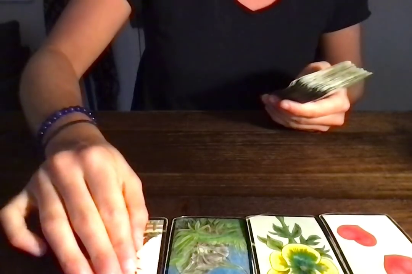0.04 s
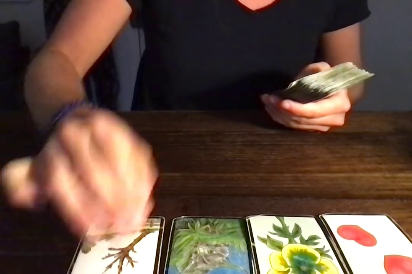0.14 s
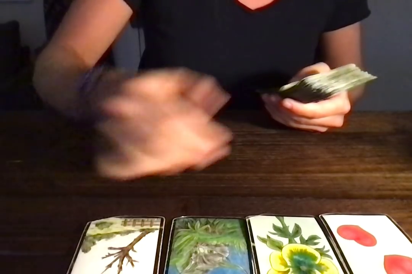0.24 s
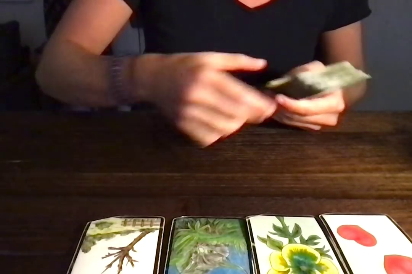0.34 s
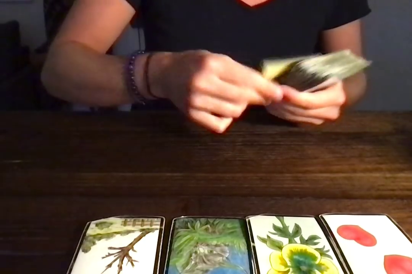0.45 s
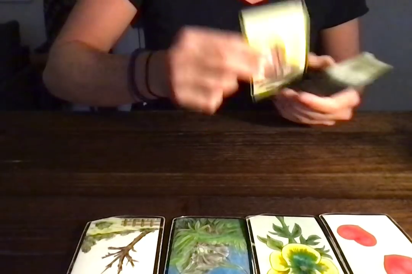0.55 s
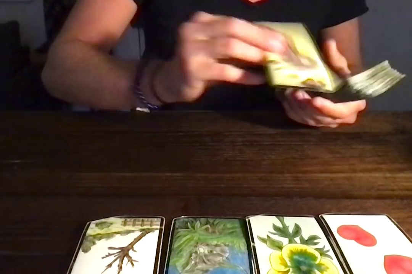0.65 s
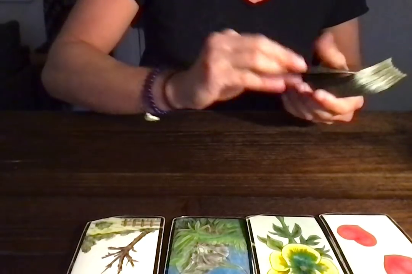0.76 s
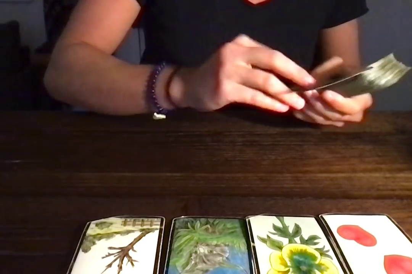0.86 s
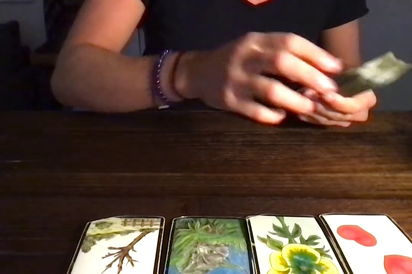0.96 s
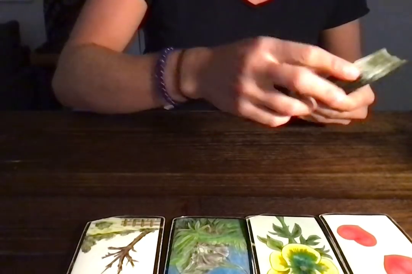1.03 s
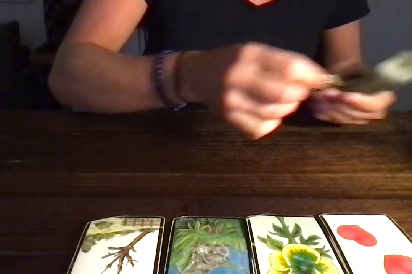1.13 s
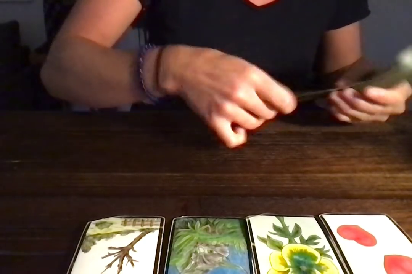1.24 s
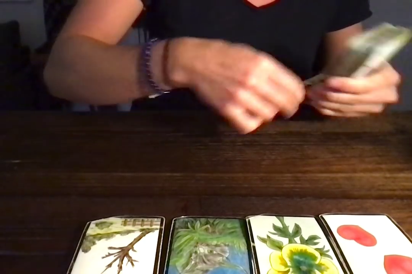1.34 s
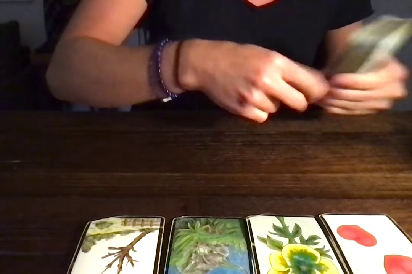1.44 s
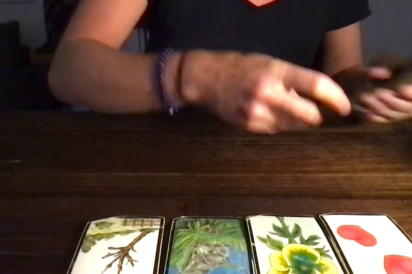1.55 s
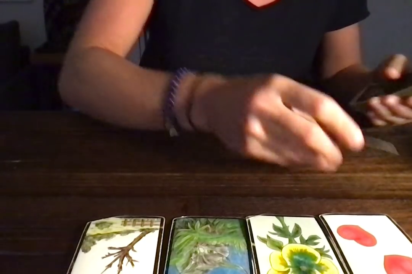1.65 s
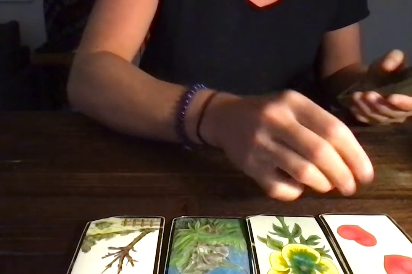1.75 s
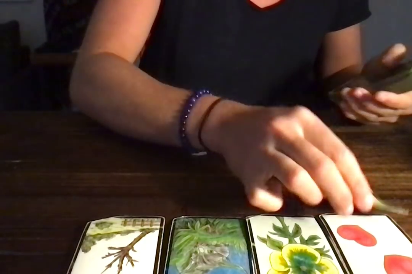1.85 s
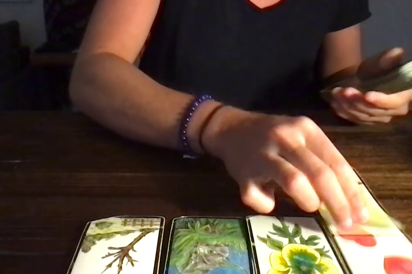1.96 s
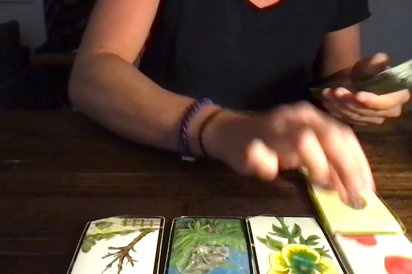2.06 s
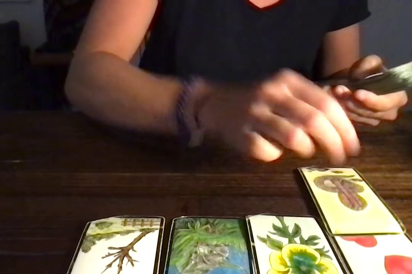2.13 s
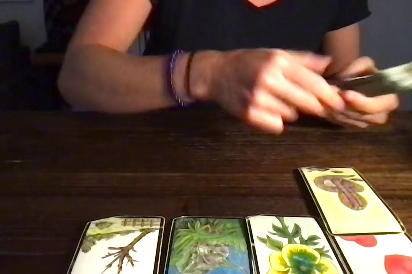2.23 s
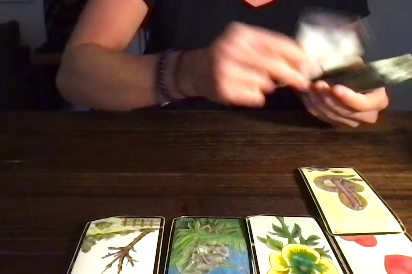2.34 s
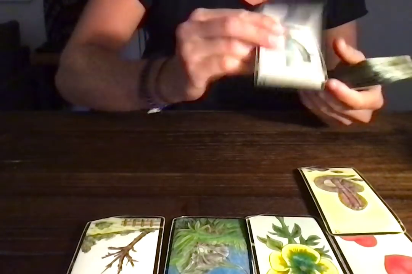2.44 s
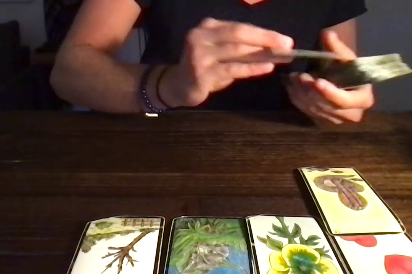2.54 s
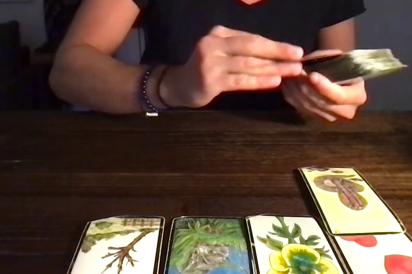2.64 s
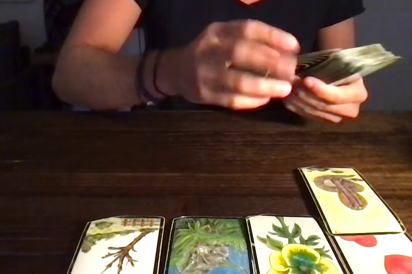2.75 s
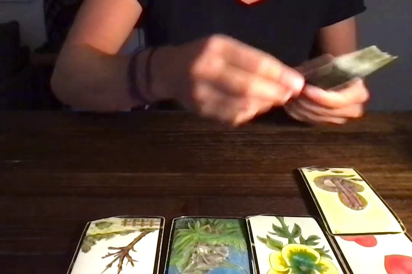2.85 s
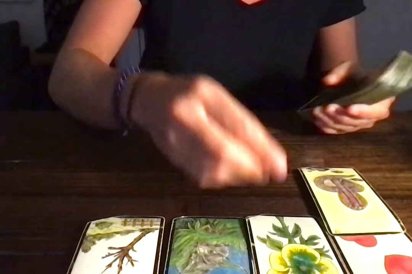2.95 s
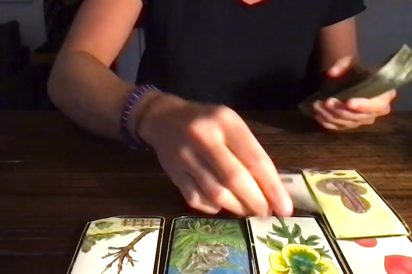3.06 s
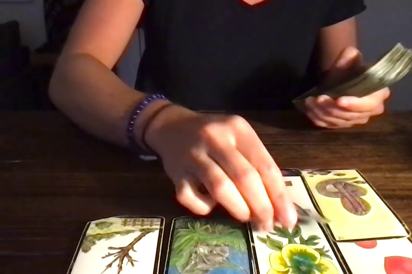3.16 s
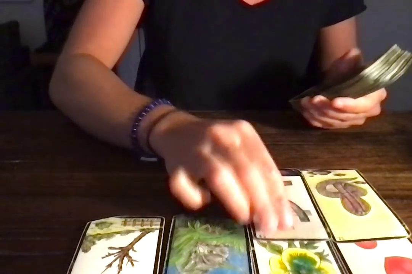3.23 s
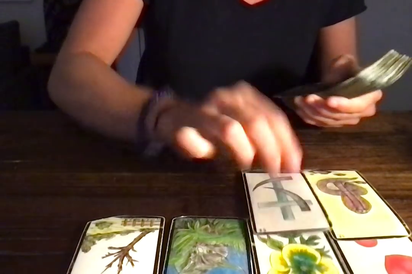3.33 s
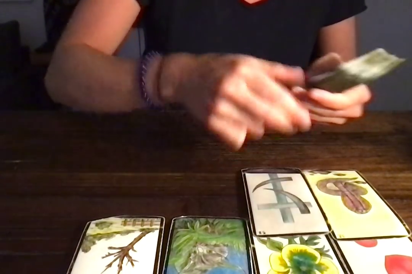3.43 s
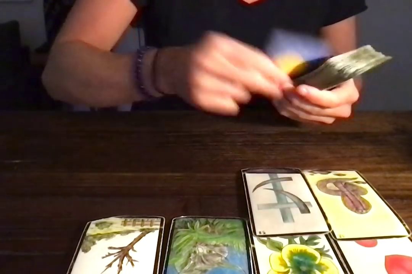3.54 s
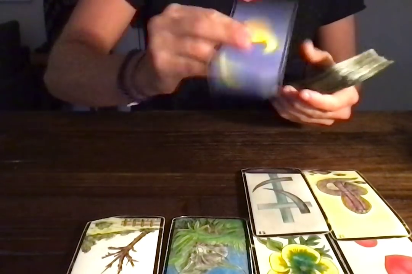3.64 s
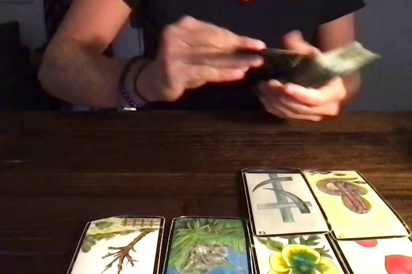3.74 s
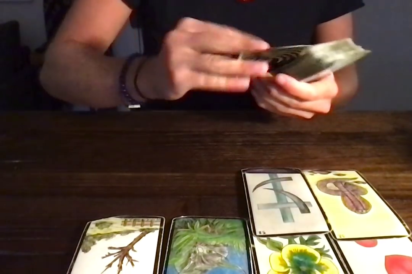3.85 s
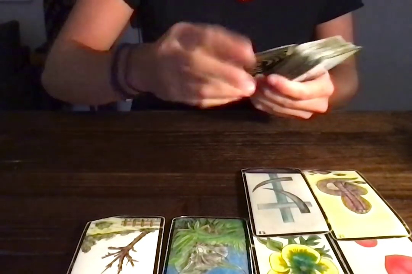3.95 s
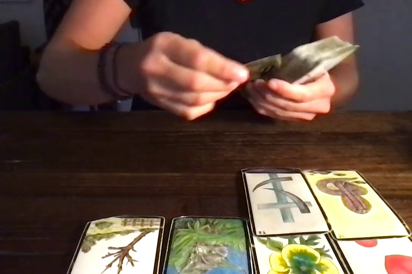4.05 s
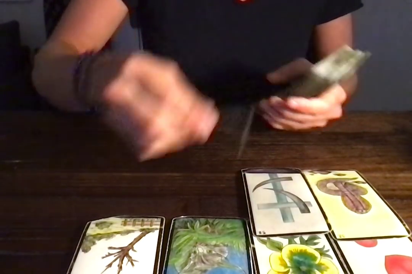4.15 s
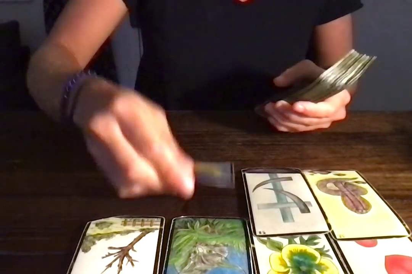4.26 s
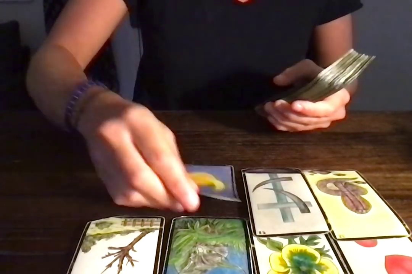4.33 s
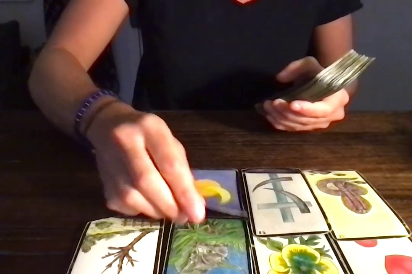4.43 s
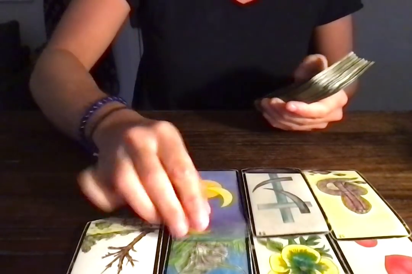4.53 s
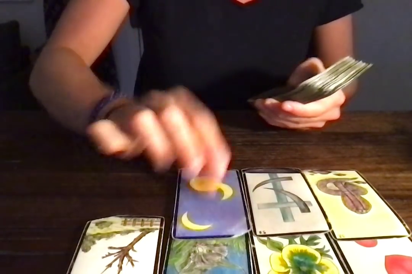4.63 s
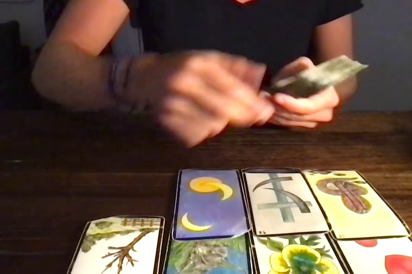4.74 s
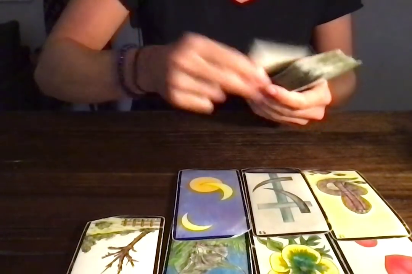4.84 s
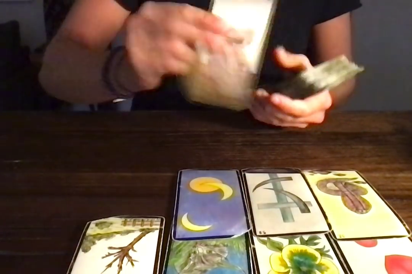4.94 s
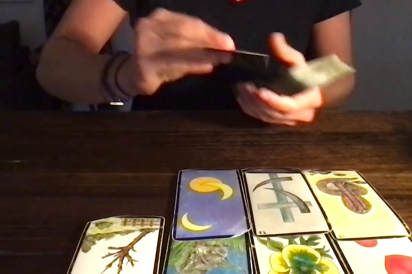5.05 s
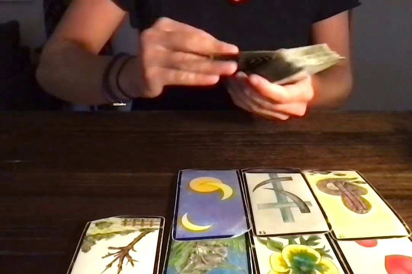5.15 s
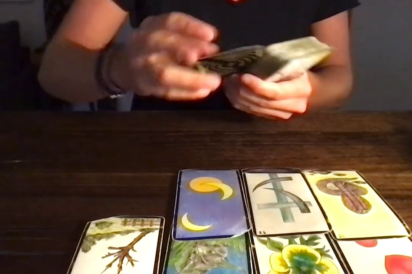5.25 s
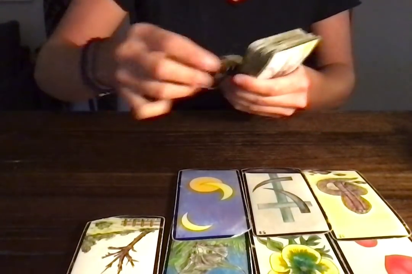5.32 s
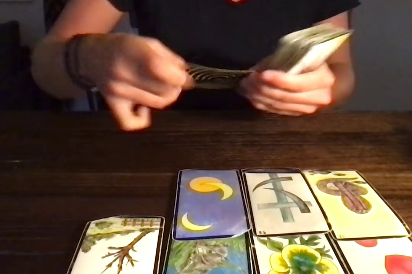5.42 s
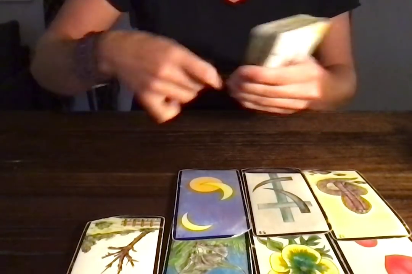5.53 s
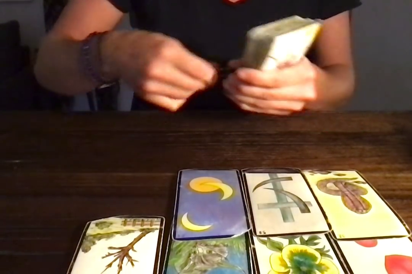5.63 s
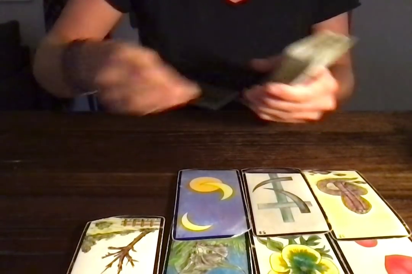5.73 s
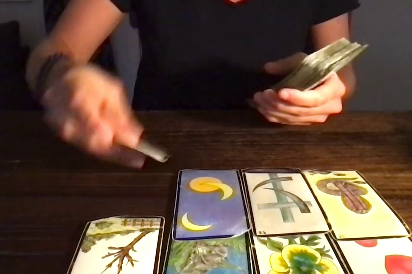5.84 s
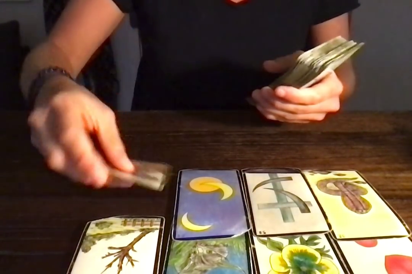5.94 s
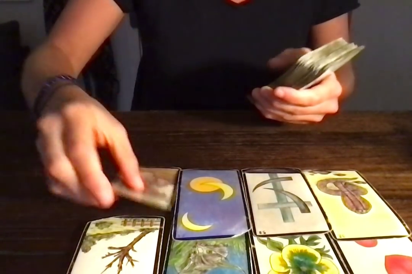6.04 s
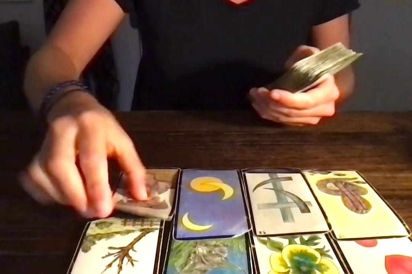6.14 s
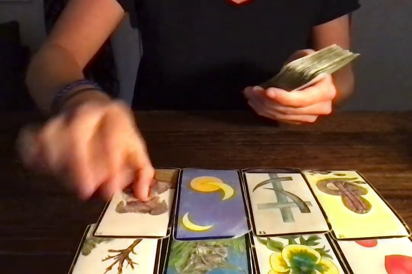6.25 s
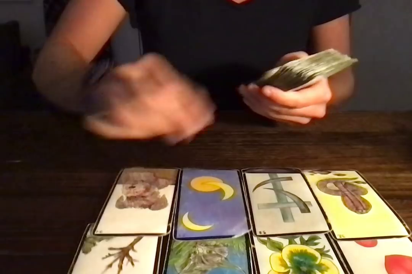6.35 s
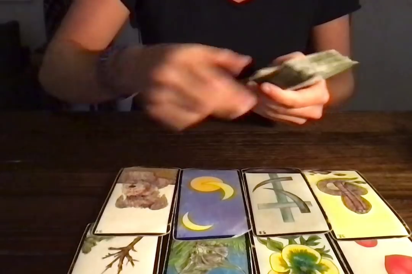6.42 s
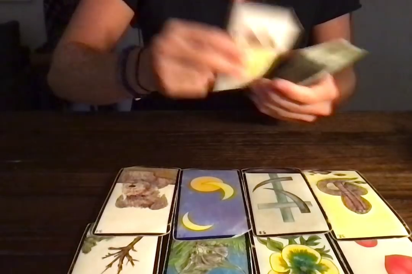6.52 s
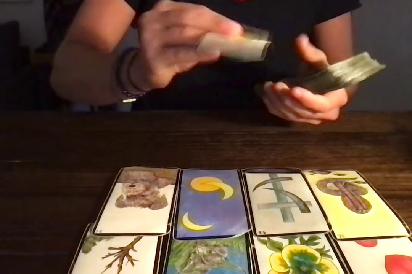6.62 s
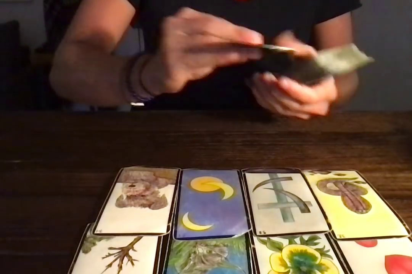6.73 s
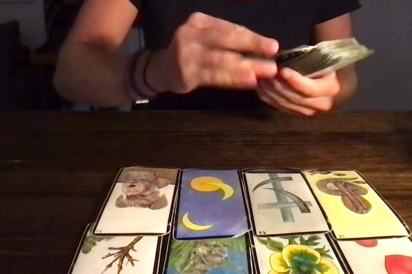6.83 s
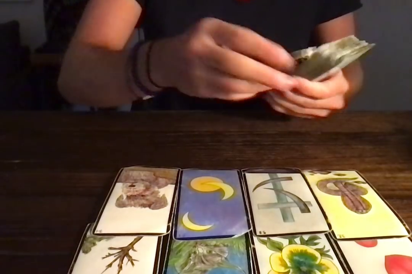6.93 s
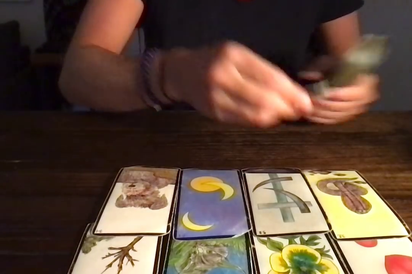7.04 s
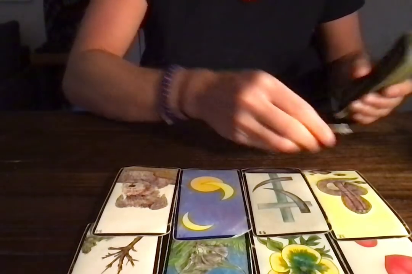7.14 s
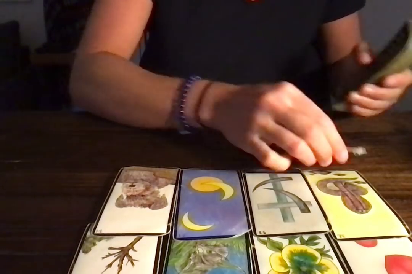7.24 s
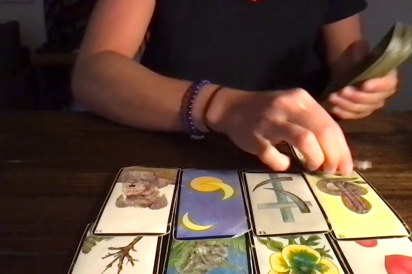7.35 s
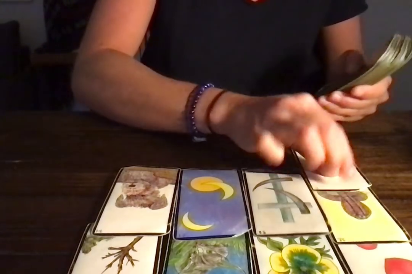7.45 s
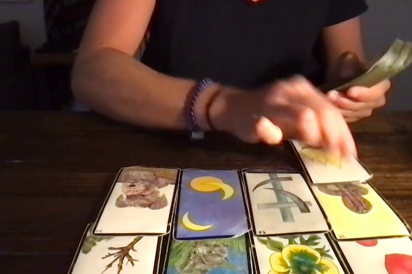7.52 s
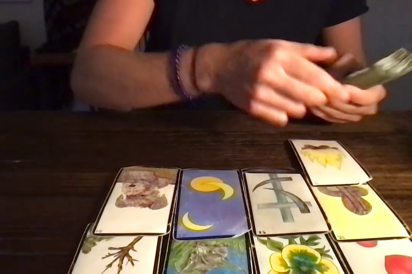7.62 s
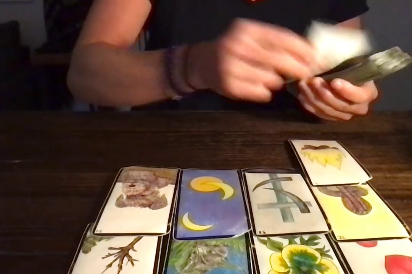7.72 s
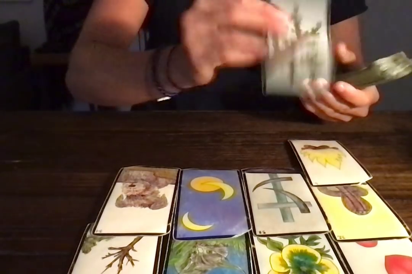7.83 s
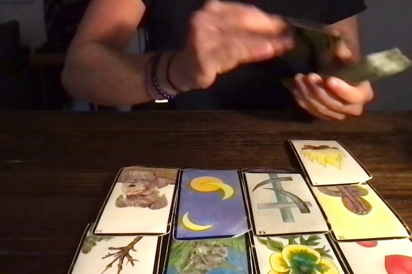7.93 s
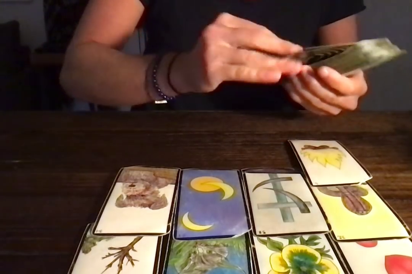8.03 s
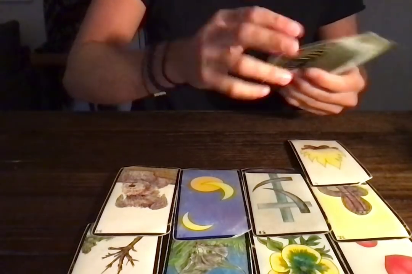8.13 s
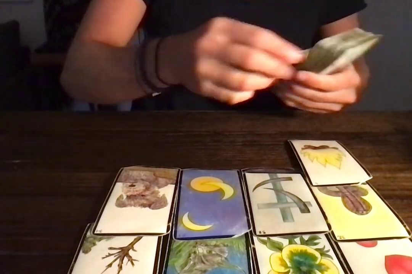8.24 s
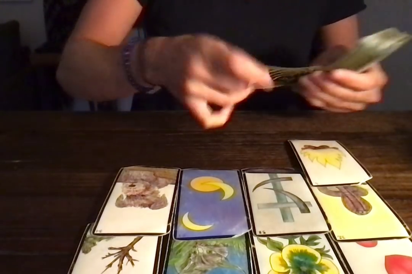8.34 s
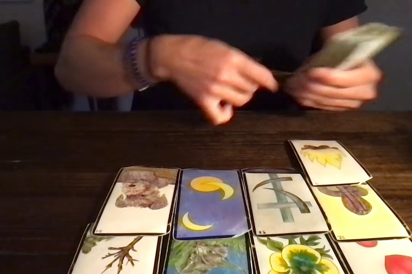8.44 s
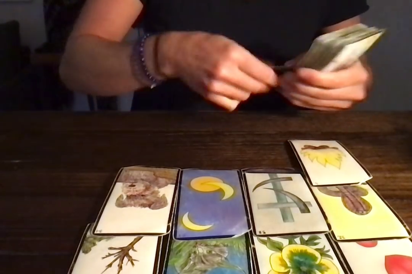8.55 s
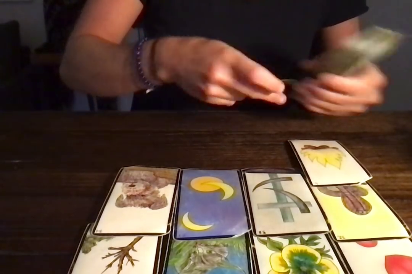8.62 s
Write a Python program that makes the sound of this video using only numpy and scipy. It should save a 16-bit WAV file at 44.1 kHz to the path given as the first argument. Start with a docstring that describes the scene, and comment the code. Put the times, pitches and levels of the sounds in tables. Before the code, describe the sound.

Cards are laid down steadily: papery slide and bump off the deck, light fumbling and skin rustle, then a crisp snap on the wooden tabletop with a tiny flop and a scraping push. This repeats five times, and one extra edge clatter against the table comes before the second snap. Low hum and still air lie beneath. Small hard room with soft early reflections, one modest mono microphone, slightly dull at the very top.

```python
"""Stiff playing cards snap one by one onto a wooden table: a grainy click sounds card, edge and wood modes.
Between snaps, filtered grain noise and light blows make cards rasp off a hand-held deck and touch fingers, pack
and, around 2.94 s, the table. Filtered noise makes the arms' rumble, the hands' rustle and still air; sines a hum.
Place: a small, bare room, with soft early reflections and a diffuse tail whose bands fade at their own rates.
Microphone: one small mono microphone, short of deep bass, into a recorder that cuts the top."""
import sys
import numpy as np
from scipy import signal
from scipy.fft import rfft, irfft, next_fast_len
from scipy.io import wavfile
from scipy.ndimage import uniform_filter1d

SR = 44100
rng = np.random.default_rng(int(sys.argv[2]) if len(sys.argv) > 2 else 0)


def put_to_file(sound):
    """Save the sound as 16-bit audio at rate SR, in the file named by the first command-line argument."""
    columns = np.atleast_2d(sound).T  # one column per channel
    safe = np.clip(columns, -1, 1)
    whole_steps = np.round(safe * 32767)
    wavfile.write(sys.argv[1], SR, whole_steps.astype(np.int16))


N = 382788
TIME = np.arange(N) / SR


def undb(db):
    """Turn decibels into an amplitude factor."""
    return 10 ** (np.asarray(db) / 20)


def unit(x):
    """Scale to rms 1."""
    return x / np.sqrt(np.mean(x ** 2))


def blow(x, db):
    """Scale a short sound so that its energy equals that of 10 ms at the given rms level."""
    return x * undb(db) / np.sqrt(np.sum(x ** 2) * 100 / SR)


def add(out, s, x):
    """Mix x into out from time s."""
    i = max(int(s * SR), 0)
    out[i:i + len(x)] += x[:max(len(out) - i, 0)]


def ring(x, response):
    """Play x through an impulse response."""
    return signal.oaconvolve(x, response)[:len(x)]


def colour(x, points, size=1024):
    """Causal minimum-phase filter that follows a table of hz and gain_db."""
    hz, db = np.transpose(points)
    f = np.maximum(np.arange(size // 2 + 1) * SR / size, 1)
    gain = undb(np.interp(np.log(f), np.log(hz), db))
    # folding the cepstrum forward in time puts the energy first
    cepstrum = irfft(np.log(gain))
    cepstrum[1:size // 2] *= 2
    cepstrum[size // 2 + 1:] = 0
    return ring(x, irfft(np.exp(rfft(cepstrum))))


def walk(rate):
    """Slow random drift with a spread near 1, drawn afresh rate times per second."""
    k = int(SR / rate)
    steps = np.repeat(rng.standard_normal(N // k + 1), k)
    return unit(uniform_filter1d(steps, k))[:N]


def grains(n, spread_db):
    """Paper fibres catching: dense clicks of very uneven size."""
    size_db = spread_db * np.minimum(rng.exponential(size=n), 6)
    return unit(rng.standard_normal(n) * undb(size_db))


def bands(x, centres):
    """Split x into overlapping bands that add up to x again."""
    spectrum = rfft(x)
    f = np.maximum(np.arange(len(x) // 2 + 1) * SR / len(x), 1)
    shares = [np.interp(np.log(f), np.log(centres), pick) for pick in np.eye(len(centres))]
    return [irfft(spectrum * share, len(x)) for share in shares]


def flutter(x, depth_db, rate):
    """The contact patch wanders, so that neighbouring bands swell and fade apart."""
    padded = np.pad(x, (0, next_fast_len(N, True) - N))
    parts = bands(padded, np.geomspace(400, 12000, 11))
    return unit(sum(part[:N] * undb(depth_db * walk(rate)) for part in parts))


# spectrum of the still room's noise, scaled as a whole later: hz, relative level_db
AIR_SPECTRUM = [(100, -7), (190, -4.5), (300, -6.5), (430, -11), (560, -17), (1000, -24.5), (1650, -28),
                (2250, -18), (2700, -18.5), (3200, -23.5), (7000, -23.5), (12000, -32), (16000, -42)]
AIR_DB = -77.5  # rms
# hum and a faint whine: pitch_hz, level_db (rms, before its wavering)
HUM_TONES = [(79.3, -66.5), (48.6, -75.5), (180, -77), (2180, -90)]


def background():
    """A hum of sines, slightly wavering in level and phase, over steady filtered noise."""
    hum = np.zeros(N)
    for hz, db in HUM_TONES:
        level = undb(db + 1.9 * walk(5.1))
        phase = 2 * np.pi * hz * TIME + 0.62 * walk(8.3)
        hum += level * np.sqrt(2) * np.sin(phase)
    air = unit(colour(rng.standard_normal(N), AIR_SPECTRUM))
    return hum + air * undb(AIR_DB)


# early reflections off nearby surfaces: delay_ms, level_db against the direct sound
REFLECTIONS = [(3.4, -41.5), (8.3, -18), (13.4, -33.5), (21.3, -22)]


def room(x):
    """Direct sound and a few early reflections, softened in the treble, each late by its longer path."""
    response = np.zeros(SR // 20)
    for ms, db in REFLECTIONS:
        add(response, ms / 1000, undb(db) * np.array([.25, .5, .25]))
    return x + ring(x, response)


# diffuse tail of the small room, band by band: hz, level_db, t60_s
ROOM_TAIL = [(60, -20, .6), (193, -9.5, 0.71), (500, -5.5, 0.54), (1250, -6, 0.57), (2920, -13, 0.62),
             (6000, -14.5, 0.49), (10000, -12, 0.36), (16000, -20.5, .28)]


def tail(x, size=SR):
    """Diffuse room sound: noise bands that build up quickly and decay, the highest ones soonest."""
    t, response = np.arange(size) / SR, np.zeros(size)
    centres = [row[0] for row in ROOM_TAIL]
    noises = bands(rng.standard_normal(size), centres)
    for (_, db, t60), noise in zip(ROOM_TAIL, noises):
        fade = np.exp(-np.log(1000) * t / t60) * (1 - np.exp(-t / 0.0014))
        response += noise * undb(db) * fade / np.sqrt(np.sum(fade ** 2))
    return ring(x, response)


# the top card slides off the pack, knocks free of it and is turned over in the fingers:
# knock_s, slide_length_s, slide_db, card_db, knock_db, thump_db, knock_hz, turn_length_s, turn_db
# (turn_db is taken before the gain of the rustle)
CARD_DRAWS = [(0.5557, .15, -61.5, -35.5, -35, -29.5, 564, 1, -67.5),
              (2.396, .11, -51, -44, -39.5, -29.5, 420, 0.71, -62.5),
              (3.5993, 0.095, -52.5, -32, -30, -30.5, 440, .2, -61.5),
              (4.9125, 0.097, -53.5, -37, -34, -36.5, 337, 0.22, -58.5),
              (6.569, 0.084, -48.5, -42, -39.5, -29.5, 393, 0.62, -61.5),
              (7.802, 0.12, -54.5, -42.5, -46.5, -39, 403, 0.71, -70)]
TURN_ATTACK_S, TURN_RELEASE_S, TURN_SAG_DB_PER_S = 0.047, 0.054, 4.5
REST_DB = -82.5  # hands that only reach out, before the gain of the rustle


def turning():
    """Fingers' effort: starts as a card comes free, sags while it is turned, stops as the hand reaches out."""
    effort = np.full(N, undb(REST_DB))
    for s, *_, length, db in CARD_DRAWS:
        age = TIME - s
        attack = np.clip(1 + age / TURN_ATTACK_S, 0, 1)
        release = np.exp(-np.maximum(age - length, 0) / TURN_RELEASE_S)
        effort += attack * release * undb(db - TURN_SAG_DB_PER_S * np.maximum(age, 0))
    return effort


# spectrum of forearms on the table top: hz, relative level_db
RUMBLE_SPECTRUM = [(20, -16), (35, -10), (51, 1.5), (65, 4.5), (80, 1), (110, -4), (160, -22.5), (260, -27),
                   (600, -57.5)]
# course of that rumble, before its gain: time_s, level_db
RUMBLE_COURSE = [(0.0, -57), (0.24, -68), (0.39, -60.5), (0.58, -57), (1.06, -51.5), (1.5, -59.5),
                 (1.72, -65), (1.86, -60.5), (2.1, -55.5), (4.57, -57), (4.91, -54.5), (6.26, -59),
                 (7.03, -55), (8.68, -55.5)]
# spectrum of skin and cloth: hz, relative level_db
RUSTLE_SPECTRUM = [(90, -19), (160, 9), (260, 2), (390, -2.5), (520, -2), (660, -1), (900, -10.5),
                   (1400, -9.5), (3000, -39)]
RUMBLE_GAIN_DB, RUSTLE_GAIN_DB = 2.5, 6


def arms(effort):
    """Forearms rumble on the table while skin and cloth rustle in fits with the fingers' work."""
    rumble = unit(colour(rng.standard_normal(N), RUMBLE_SPECTRUM, size=8192))
    rumble_db = np.interp(TIME, *np.transpose(RUMBLE_COURSE)) + RUMBLE_GAIN_DB
    rustle = flutter(colour(grains(N, 5.8), RUSTLE_SPECTRUM, size=2048), depth_db=4, rate=18)
    fits = undb(RUSTLE_GAIN_DB + 2 * walk(22))
    return rumble * undb(rumble_db) + rustle * effort * fits


# a card brushes along the skin: start_s, end_s, level_db
SKIN_RUBS = [(0.81, 0.904, -57), (1.062, 1.346, -58.5), (1.405, 1.522, -58), (1.597, 1.791, -58.5),
             (1.843, 1.885, -68), (2.847, 2.89, -53), (3.84, 3.89, -64), (4.043, 4.099, -58.5),
             (4.28, 4.53, -69.5), (5.037, 5.196, -65.5), (5.34, 5.441, -63.5), (5.697, 5.78, -61),
             (6.03, 6.194, -65), (6.72, 6.895, -62.5), (7.003, 7.058, -53.5), (7.28, 7.336, -57.5),
             (8.226, 8.308, -59), (8.417, 8.492, -63.5), (8.52, 8.68, -62.5)]
# rasp of the card's sheet: hz, relative level_db
RASP_SPECTRUM = [(300, -12.5), (700, 0.5), (1200, -6), (1700, -0.5), (2250, 7), (3000, -2.5), (4200, -8.5),
                 (7000, -15), (14000, -29)]
# hiss of the card's edge: hz, relative level_db
HISS_SPECTRUM = [(2000, -32.5), (4000, 7.5), (6500, 5), (9000, -6), (11500, -2.5), (14000, -3),
                 (16500, -15)]
SLIDE_HISS_DB, RUB_HISS_DB = -8, -10  # hiss against rasp: card on card, card on skin
SLIDE_SKEW, RUB_SKEW = 0.9, 0.71  # above 1 a stroke is fastest late, below 1 early
SCRAPE_LEAD_S, SCRAPE_S = 0.021, 0.019  # the scrape starts this long before a snap, and its length
JERK_DB, STICK_DB = 3, 3  # unevenness of the pull, of sticking fibres
CATCH_SHARE, CATCHES_PER_S = 0.79, 90  # single catches of a fibre


def rubs():
    """Sliding card: an uneven pull drives the rasp of the sheet and the hiss of its edge; fibres crackle."""
    rasp, hiss = np.zeros((2, N))
    # off the pack, along the skin, and off the fingertip just before a snap
    strokes = [(s - length, length + 0.003, db, SLIDE_HISS_DB, SLIDE_SKEW)
               for s, length, db, *_ in CARD_DRAWS]
    strokes += [(start - .008, end - start + .02, db, RUB_HISS_DB, RUB_SKEW)
                for start, end, db in SKIN_RUBS]
    strokes += [(s - SCRAPE_LEAD_S, SCRAPE_S, db, RUB_HISS_DB, RUB_SKEW)
                for s, *_, db in CARD_SNAPS]
    for start, length, db, hiss_db, skew in strokes:
        # the pull gathers speed, then lets go
        progress = np.linspace(0, 1, int(length * SR)) ** skew
        stroke = undb(db) * abs(np.sin(np.pi * progress)) ** 0.51
        add(rasp, start, stroke)
        add(hiss, start, stroke * undb(hiss_db))
    speed = undb(JERK_DB * walk(35) + STICK_DB * walk(170) - 1.8)
    catches = unit((rng.random(N) < CATCHES_PER_S / SR) * rng.standard_normal(N))
    friction = grains(N, 3.5) + CATCH_SHARE * catches
    sheet = flutter(colour(friction, RASP_SPECTRUM), depth_db=4.5, rate=32)
    edge = flutter(colour(grains(N, 3), HISS_SPECTRUM), depth_db=3, rate=16)
    return speed * rasp * sheet + np.sqrt(speed) * hiss * edge


def modes(t, table, detune, scatter_db):
    """Decaying modes; grip and point of contact change their pitch and weights from blow to blow."""
    hz, db, t60 = np.transpose(table)[:, :, None]
    pitch, weight = rng.standard_normal((2, len(table), 1))
    fade = undb(db + scatter_db * weight) * np.exp(-np.log(1000) * t / t60)
    return np.sum(fade * np.cos(2 * np.pi * hz * (1 + detune * pitch) * t), axis=0)


# resonances of the wooden top: pitch_hz, level_db, t60_s
WOOD_MODES = [(147, 0.5, 0.097), (186.4, 6.5, 0.12), (258.2, 2, 0.097), (330, 1, 0.061), (377, 1, 0.069),
              (473, 1.5, 0.064), (610, -12, 0.048), (626, -3, 0.076), (736, -12, 0.013), (796, -8, 0.11),
              (995, 2.5, 0.057)]
# crack of the card's face: hz, gain_db
CRACK_SPECTRUM = [(300, -40.5), (1200, -10), (1900, 4), (2700, 4), (3800, -0.5), (5200, -7), (7000, -15.5),
                  (10000, -34), (16000, -51)]
# tick of the card's edge: hz, gain_db
EDGE_SPECTRUM = [(1500, -20), (3500, 7.5), (5200, 2.5), (6900, 1.5), (9000, -4.5), (11000, -9), (14500, -7),
                 (16500, -52.5)]
# smack that goes with the wood: hz, gain_db
SMACK_SPECTRUM = [(80, -8), (150, 11), (260, 6.5), (400, 2.5), (650, 1), (850, -12.5), (1020, -1.5),
                  (1250, -27.5), (2000, -14.5), (5000, -39.5)]
# soft fingertips and wood pass little treble: hz, gain_db
CUSHION_SPECTRUM = [(1000, -2), (2000, 0), (4000, -5), (8000, -44), (16000, -66.5)]


def contact(card_db, edge_db, knock_db, thump_db, contact_ms, flex_hz, knock_hz,
            crunch, flex_db, smack_db, hollow_db, thump_hz, thump_s):
    """One blow: a click and brief crunch of fibres sound card, edge and wood; the hand's weight thumps."""
    t = np.arange(SR // 12) / SR
    fade = np.exp(-1000 * t / max(contact_ms, .2))
    drive = crunch * np.sqrt(contact_ms) * blow(grains(len(t), 4.75) * fade, 0)
    drive -= blow(1. * (t == 0), 0)
    # the card never lands flat: a few weaker touches follow within milliseconds
    drive[rng.integers(SR // 700, SR // 90, 3)] += .2 * rng.standard_normal(3)
    # the free length of card sets its flexing pitch
    crack = colour(drive, CRACK_SPECTRUM)
    flex_modes = [(flex_hz, 0, .011), (1.537 * flex_hz, -6, .008)]
    flex = ring(crack, modes(t, flex_modes, detune=0.069, scatter_db=-2.5))
    card = blow(crack, 0) + blow(flex, flex_db)
    edge = colour(drive, EDGE_SPECTRUM)
    # the place of the blow favours the modes near one pitch, and a short hollow ring is added there
    body = [(hz, db - 7 * abs(np.log2(hz / knock_hz)), t60) for hz, db, t60 in WOOD_MODES]
    body.append((knock_hz, hollow_db, .045))
    soft = colour(drive, CUSHION_SPECTRUM)
    knock = ring(soft, modes(t, body, detune=.015, scatter_db=2))
    wood = blow(knock, 0) + blow(colour(soft, SMACK_SPECTRUM), smack_db)
    thump = -np.sin(2 * np.pi * thump_hz * t) * np.exp(-t / thump_s) * (1 - t / t[-1])
    return blow(card, card_db) + blow(edge, edge_db) + blow(wood, knock_db) + blow(thump, thump_db)


# how each kind of touch sounds: contact time, edge against card,
# smack and hollow ring against wood, thump pitch and decay
FREEING = dict(contact_ms=4.25, edge_db=-15.5, smack_db=3.5, hollow_db=-1, thump_hz=69, thump_s=0.0065)
BRIGHT = dict(contact_ms=2.58, edge_db=-7.5, smack_db=-7.5, hollow_db=4.5, thump_hz=60, thump_s=.013)
DULL = dict(contact_ms=3.1, edge_db=-22.5, smack_db=-4.5, hollow_db=7.5, thump_hz=60, thump_s=0.018)
DULL_FLEX_HZ = 2100  # flexing pitch of the card in freeing and dull touches


def tap(card_db, knock_db, thump_db, flex_hz, knock_hz, contact_ms, edge_db, **body):
    """A touch of the cards, crunchier than a snap, its edge level tied to that of the card."""
    return contact(card_db, card_db + edge_db, knock_db, thump_db, contact_ms, flex_hz, knock_hz,
                   crunch=0.97, flex_db=-3, **body)


FUMBLES_PER_S = 6
FUMBLE_DB = 5.5  # against the fingers' effort


def fumbles(effort, count=120):
    """Faint touches at chance times and knock pitches, as strong as the fingers are busy."""
    out = np.zeros(N)
    times = np.cumsum(rng.exponential(size=count)) / FUMBLES_PER_S
    for s in times[times < N / SR]:
        db = 20 * np.log10(effort[int(s * SR)]) + FUMBLE_DB
        knock_hz = rng.uniform(300, 700)
        add(out, s, tap(db + 4, db, db, DULL_FLEX_HZ, knock_hz, **DULL))
    return out


# dull touches of the cards: fingertips on card and pack, and around 2.94 s a card edge hitting the table:
# time_s, card_db, knock_db, thump_db, knock_hz
DULL_TOUCHES = [(0.143, -69.5, -70, -66, 430), (0.4622, -47.5, -52.5, -49, 403),
                (0.5772, -45.5, -45, -58, 500), (0.7358, -53.5, -46, -44, 630),
                (0.9613, -44, -59, -55, 640), (1.033, -51, -48, -46, 237),
                (1.3852, -49.5, -41.5, -41.5, 557), (1.525, -56.5, -50, -41.5, 480),
                (1.602, -50, -47.5, -44, 396), (2.714, -44.5, -54, -47, 750), (2.774, -48, -44.5, -40, 405),
                (2.909, -53, -47.5, -46, 537), (2.945, -30.5, -29.5, -34, 388),
                (3.4733, -51, -58, -55, 700), (3.7339, -52.5, -43.5, -42, 390),
                (3.79, -48.5, -50, -41, 527), (3.956, -56.5, -49.5, -56, 395),
                (3.996, -60, -57.5, -54, 300), (4.093, -61, -68, -66.5, 490),
                (4.151, -60.5, -54.5, -42, 650), (4.193, -59, -43.5, -51, 420),
                (5.089, -53.5, -45.5, -51, 555), (5.109, -59, -58.5, -45.5, 397),
                (5.28, -51.5, -50, -46, 260), (5.2969, -46, -38, -45, 246), (5.522, -57.5, -51.5, -63, 623),
                (5.602, -54.5, -53, -49.5, 554), (5.751, -55, -55, -45.5, 274),
                (5.837, -63.5, -49.5, -64, 402), (6.009, -68.5, -59.5, -70, 857),
                (6.457, -55, -50.5, -57, 570), (6.7472, -63, -47, -51, 380),
                (6.7718, -48.5, -44.5, -58, 500), (6.7982, -51.5, -39, -54, 252),
                (6.881, -46, -44.5, -41.5, 570), (6.978, -51, -47, -65, 650),
                (7.987, -48.5, -45.5, -47, 620), (8.174, -48.5, -44.5, -66, 586),
                (8.2282, -51, -49, -55, 570), (8.513, -49.5, -48.5, -45, 660), (8.57, -53.5, -45, -60, 650)]


def bumps():
    """Dull blows as a card comes free or is touched, each led in by a short brush of the card."""
    out, t = np.zeros(N), np.arange(SR // 25) / SR
    blows = [(s, *knock, FREEING) for s, _, _, *knock, _, _ in CARD_DRAWS]
    blows += [(*row, DULL) for row in DULL_TOUCHES]
    for s, card_db, knock_db, thump_db, knock_hz, touch in blows:
        add(out, s, tap(card_db, knock_db, thump_db, DULL_FLEX_HZ, knock_hz, **touch))
        fade = np.exp(-1000 * t / (1.5 * touch["contact_ms"]))
        brush = colour(grains(len(t), 5), RASP_SPECTRUM) * fade
        # reversed, so that it swells into the blow
        add(out, s - len(t) / SR, blow(brush[::-1], card_db - 14.5))
    return out


# bright touches of the cards: corners flicking, and around 2.94 s a card edge hitting the table:
# time_s, card_db, knock_db, flex_hz, knock_hz
BRIGHT_TOUCHES = [(0.397, -47, -48, 2580, 250), (0.8163, -43, -46, 2400, 645),
                  (1.067, -45.5, -46.5, 2100, 640), (1.194, -47, -48.5, 1950, 640),
                  (2.263, -49.5, -49.5, 3400, 350), (2.4539, -35.5, -43, 2210, 388),
                  (2.6233, -43.5, -41.5, 1980, 547), (2.9421, -33, -32.5, 1670, 403),
                  (2.9649, -32, -34, 2690, 330), (3.651, -38.5, -42, 2000, 380),
                  (4.8265, -42.5, -45, 2630, 604), (4.9661, -35.5, -45, 2420, 603),
                  (6.039, -50.5, -52, 2170, 565), (6.6208, -36.5, -39, 2300, 373),
                  (7.116, -26, -30, 2760, 513), (7.6929, -48.5, -46.5, 3460, 370),
                  (7.8596, -45, -47.5, 2370, 372), (8.025, -47.5, -42.5, 3620, 343)]
BRIGHT_THUMP_DB = -6  # against the knock
REBOUND_S, REBOUND_DB = 0.0081, -12  # the card springs back and touches again


def flicks():
    """The stiff card touches with a short bright click and rebounds once."""
    out = np.zeros(N)
    for s, card_db, knock_db, flex_hz, knock_hz in BRIGHT_TOUCHES:
        thump_db = knock_db + BRIGHT_THUMP_DB
        for delay, db in (0, 0), (REBOUND_S, REBOUND_DB):
            click = tap(card_db, knock_db, thump_db, flex_hz, knock_hz, **BRIGHT)
            add(out, s + delay, undb(db) * click)
    return out


# push of the laid card along the table: hz, relative level_db
PUSH_SPECTRUM = [(400, -6.5), (1300, -24), (2000, -17.5), (2500, 28.5), (3200, 26.5), (4100, -42),
                 (5200, -1), (9000, -57), (15000, -37.5)]
# a bent card scrapes off the fingertip, snaps onto the table, then is pushed into place:
# time_s, card_db, edge_db, knock_db, thump_db, contact_ms, flex_hz, knock_hz,
# push_db (before its swell and fade), lead_db, lead_ms, scrape_db
CARD_SNAPS = [(1.9925, -24.5, -26.5, -27, -28.5, 2.3, 2720, 273, -62, -35, 6.3, -63),
              (3.242, -28.5, -31.5, -26, -28.5, 2.93, 2230, 295, -48.5, -30, 2.6, -47),
              (4.561, -25, -26, -29.5, -33, 2.97, 3630, 576, -46.5, -42.5, 8.6, -35),
              (6.181, -30.5, -27, -29.5, -40, 9.9, 2050, 480, -55.5, -47, 6.9, -48),
              (7.4238, -28, -29, -30, -27, 3.3, 2800, 490, -40.5, -24, 1.4, -77)]
FLOP_DB = -12  # the rest of the card against its corner


def snaps():
    """The corner slaps the table after a swelling scrape, the rest of the card flops after it and is pushed on."""
    out, t = np.zeros(N), np.arange(SR // 3) / SR
    for s, *touch, push_db, lead_db, lead_ms, _ in CARD_SNAPS:
        contact_ms = touch[4]
        # a slower contact leaves the far end longer in the air
        flop_s = 0.0073 + 0.00066 * contact_ms
        for delay, db in (0, 0), (flop_s, FLOP_DB):
            slap = contact(*touch, crunch=.6, flex_db=-2.5, smack_db=0.5, hollow_db=-7.5,
                           thump_hz=139, thump_s=0.0049)
            add(out, s + delay, undb(db) * slap)
        lead = colour(grains(len(t), 3), CRACK_SPECTRUM) * np.exp(-1000 * t / lead_ms)
        # reversed, so that it swells into the snap
        add(out, s - len(t) / SR, blow(lead[::-1], lead_db))
        swell = (1 - np.exp(-t / 0.016)) * np.exp(-t / 0.15) * (1 - (t / t[-1]) ** 2)
        push = unit(colour(grains(len(t), 1.6), PUSH_SPECTRUM)) * swell
        add(out, s, push * undb(push_db))
    return out


def scene(count=3):
    """A card radiates differently in each direction, so several versions of each snap feed the room."""
    effort = turning()
    bed = arms(effort) + background()
    directions = [snaps() for _ in range(count)]
    handling = rubs() + flicks() + bumps() + fumbles(effort)
    diffuse = sum(tail(handling + snap) for snap in directions) / np.sqrt(count)
    # the first version is also the direct sound; the bed gets no room sound
    return (room(handling + directions[0]) + diffuse + bed)[None]


TOP_HZ = 16400  # upper limit of the recorder


def record(dry):
    """The small microphone loses the deepest bass; the recorder cuts the top."""
    bass_cut = signal.butter(4, 37, "high", fs=SR, output="sos")
    top_cut = signal.ellip(8, .2, 70, TOP_HZ, fs=SR, output="sos")
    return signal.sosfilt(top_cut, signal.sosfilt(bass_cut, dry))


dry = scene()
out = record(dry)
put_to_file(out)
```